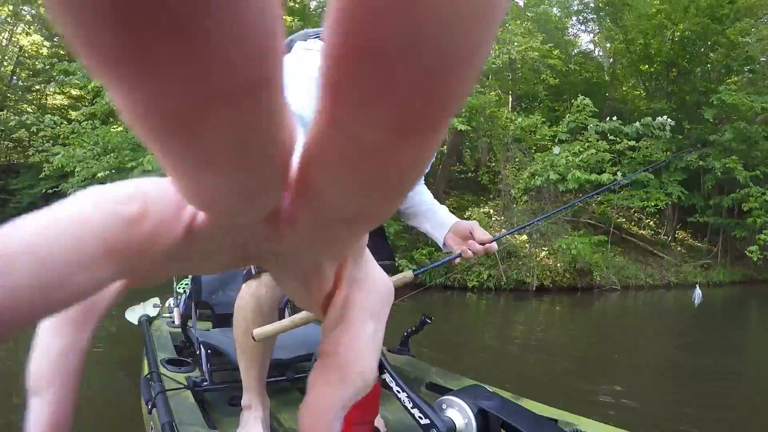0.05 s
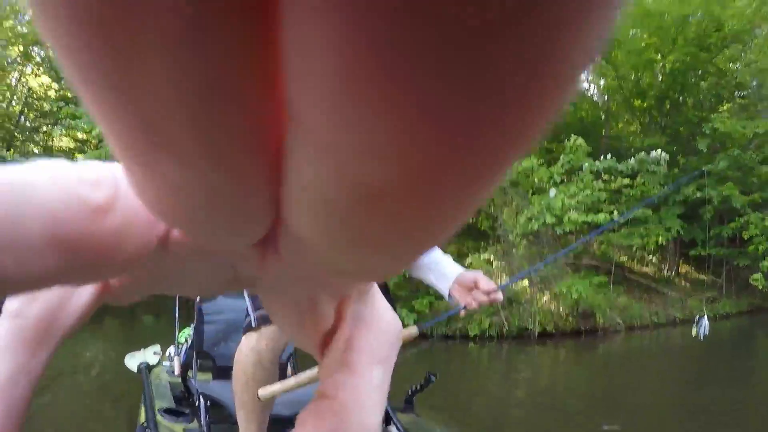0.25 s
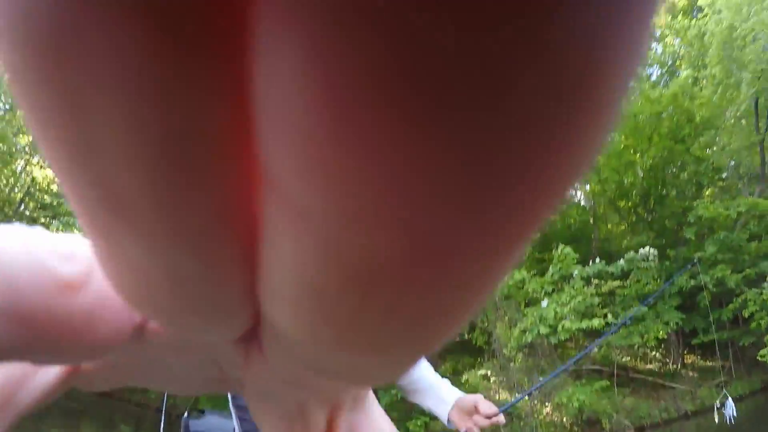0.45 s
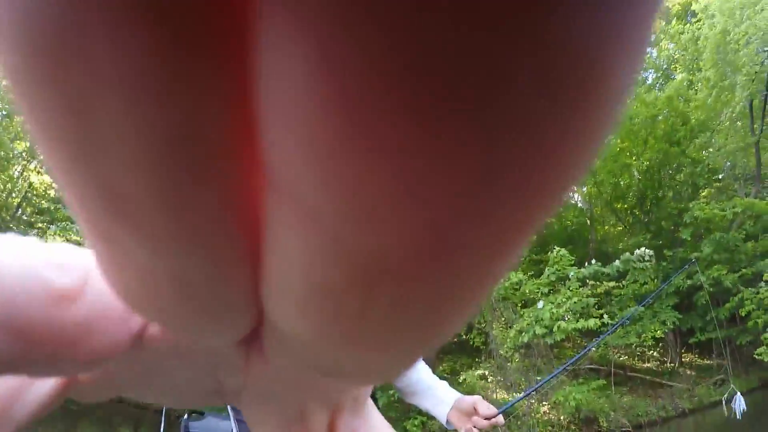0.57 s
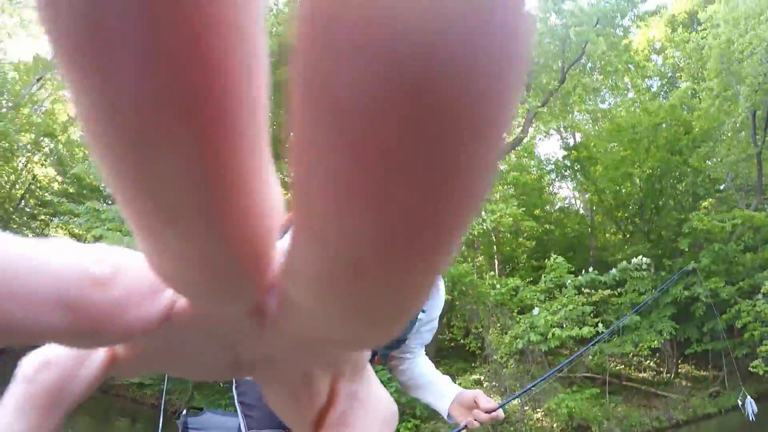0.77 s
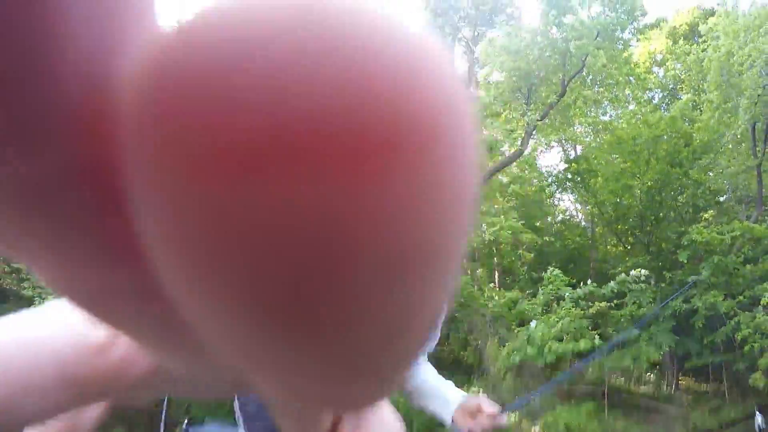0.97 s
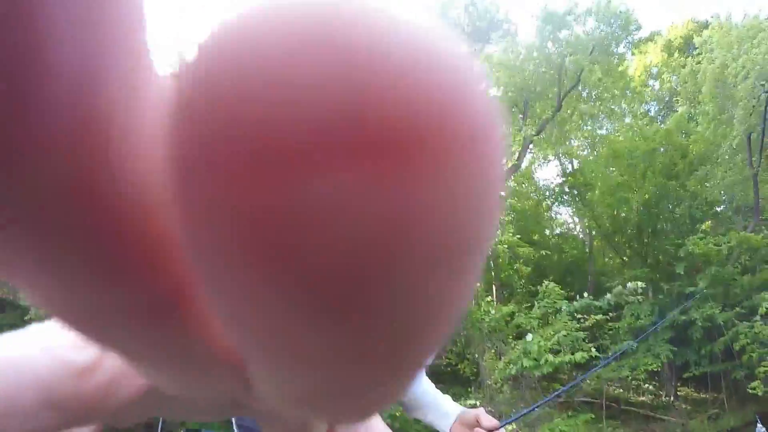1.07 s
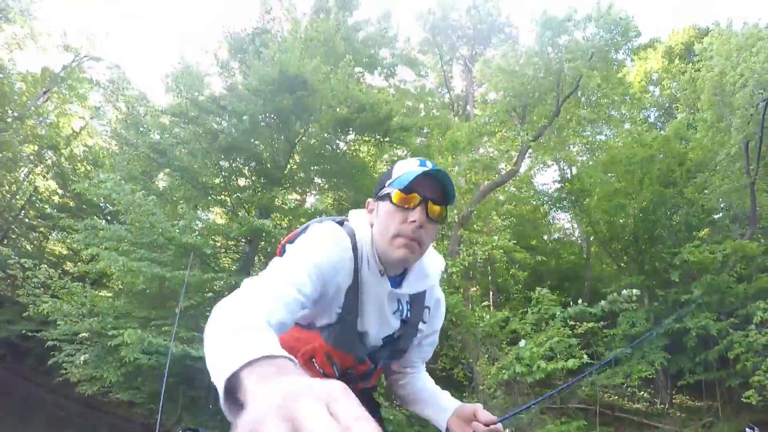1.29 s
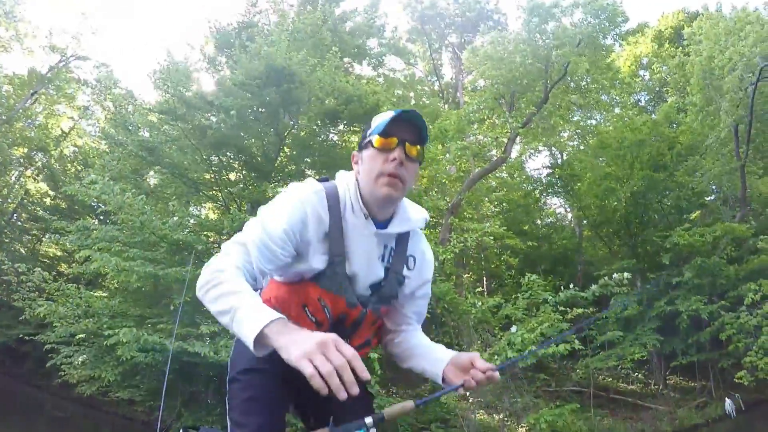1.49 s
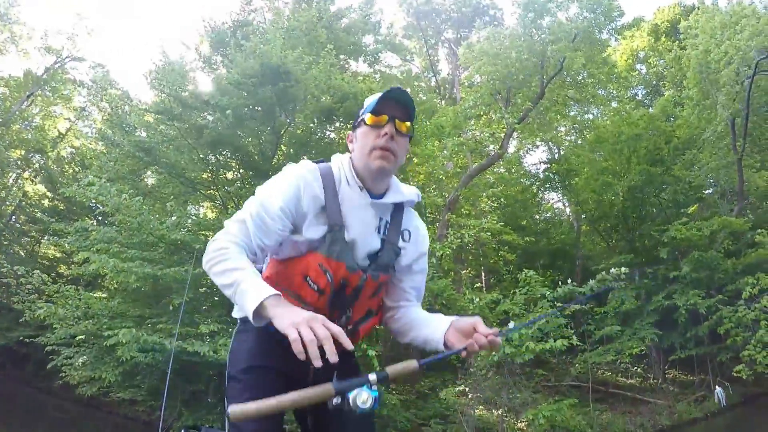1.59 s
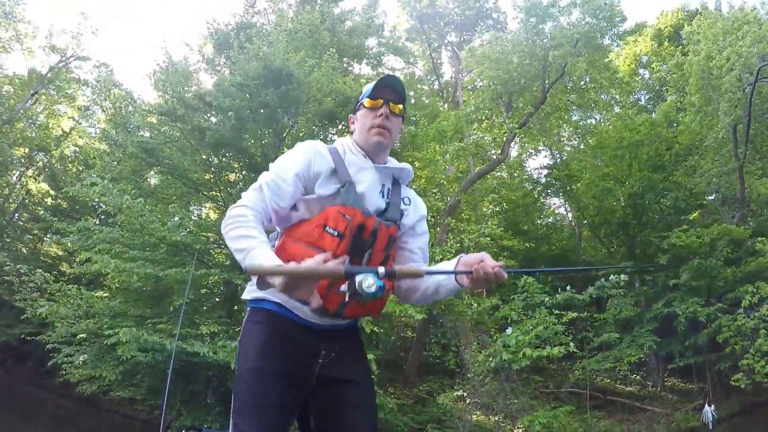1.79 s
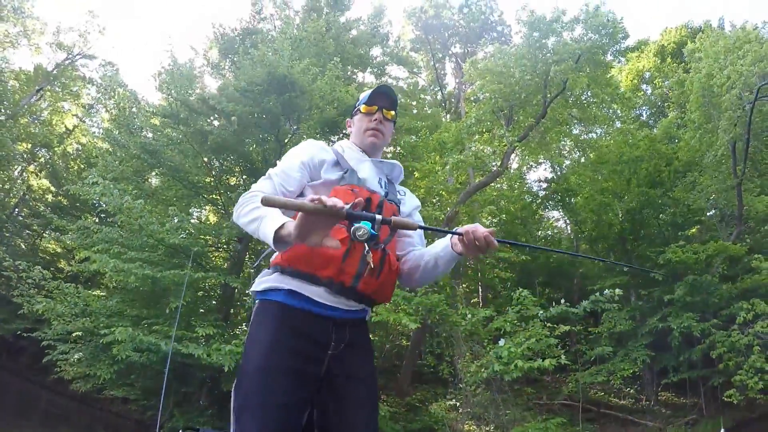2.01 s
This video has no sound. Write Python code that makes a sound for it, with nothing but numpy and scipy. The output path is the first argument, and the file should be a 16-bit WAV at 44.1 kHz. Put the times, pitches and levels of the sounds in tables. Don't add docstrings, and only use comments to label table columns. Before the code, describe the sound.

Hard plastic snaps and clicks as fingers tilt a small camera on a kayak mount

```python
import sys
import numpy as np
from scipy import signal
from scipy.io import wavfile
from scipy.ndimage import uniform_filter1d

SR = 44100
rng = np.random.default_rng(int(sys.argv[2]) if len(sys.argv) > 2 else 0)


def invert_db(level):
    return 10 ** (np.asarray(level, dtype=float) / 20)


def bounce(signal):
    frames = np.transpose(np.atleast_2d(signal))
    limited = np.clip(frames, -1, 1)
    pcm = np.round(limited * 32767).astype(np.int16)
    wavfile.write(sys.argv[1], SR, pcm)


N = 90404


def evened(x):
    return x / np.sqrt(np.mean(x ** 2) + 1e-20)


def add(mix, start_s, sound):
    part = mix[round(start_s * SR):][:len(sound)]
    part += sound[:len(part)]


def noise(points, peaks, size, patchy_db, flicker_db, source=None):
    x = rng.standard_normal(N) if source is None else source
    hz, frame_s, z = signal.stft(x, SR, nperseg=size, noverlap=size * 3 // 4)
    point_hz, point_db = np.transpose(points)
    db = np.interp(np.log(hz + 1), np.log(point_hz + 1), point_db, left=-70, right=-90)
    for center_hz, width_hz, peak_db in peaks:
        db = db + peak_db / (1 + (2 * (hz - center_hz) / width_hz) ** 2)
    patch = uniform_filter1d(rng.standard_normal(z.shape), size=4, axis=0)
    patch = evened(uniform_filter1d(patch, size=16, axis=1))
    flicker = evened(uniform_filter1d(rng.standard_normal(len(frame_s)), size=3))
    z = z * invert_db(db[:, None] + patchy_db * patch + flicker_db * flicker)
    return evened(signal.istft(z, SR, nperseg=size, noverlap=size * 3 // 4)[1][:N])


def ring(modes, drive, tilt_db=0):
    t, out = np.arange(SR // 2) / SR, 0
    for hz, db, t60_s in modes:
        mode = signal.fftconvolve(invert_db(-60 * t / t60_s) * np.sin(2 * np.pi * hz * t), drive)
        out = out + invert_db(db + tilt_db * np.log2(hz / 3000)) * mode / abs(mode).max()
    return out / abs(out).max()


def bump(length_s):
    return np.hanning(max(int(length_s * SR), 1) + 2)[1:-1]


# frequency in Hz, density in dB per Hz.
AIR = [(290, -39.5), (500, -10.5), (641, 0.5), (821, -12), (936, -7.5), (1610, -11), (5080, -13),
       (14700, -25), (16300, -47.5)]
# frequency in Hz, width in Hz, height in dB.
AIR_PEAKS = [(2600, 330, 7), (4720, 280, 6.5), (9500, 110, -1.5), (14300, 300, 10.5)]


def air():
    return invert_db(-64) * noise(AIR, AIR_PEAKS, size=512, patchy_db=-0.9, flicker_db=0.5)


# frequency in Hz, density in dB per Hz.
RIVER = [(8.8, -38), (15, -14.5), (49, 1), (82, -12.5), (183, -24.5), (221, -21), (351, -29), (402, -22.5),
         (900, -49), (1170, -88.5), (1980, -120)]
# frequency in Hz, width in Hz, height in dB.
RIVER_PEAKS = [(420, 150, 3), (258, 22, 1)]
# time in seconds, level in dB.
RIVER_SWAY = [(0.0, -37), (0.14, -51.5), (0.26, -41.5), (0.53, -43.5), (0.77, -43.5), (1.21, -41.5),
              (1.38, -43), (1.549, -44), (1.75, -44.5), (2.05, -42.5)]


def river():
    point_s, point_db = np.transpose(RIVER_SWAY)
    level_db = np.interp(np.arange(N) / SR, point_s, point_db) + 3
    return invert_db(level_db) * noise(RIVER, RIVER_PEAKS, size=2048, patchy_db=2.0, flicker_db=1.0)


# frequency in Hz, density in dB per Hz.
LEAVES = [(590, -28), (1000, -6), (1940, 12.5), (2250, -6), (2700, 12.5), (3370, 2), (4820, 5.5),
          (9000, -29), (11700, -55.5), (19800, -120)]


def leaves():
    peak_s, rise_s, fall_s, level_db = 1.52, 0.06, 0.25, -63
    t = np.arange(N) / SR
    gust = np.exp(-((t - peak_s) / np.where(t < peak_s, rise_s, fall_s)) ** 2)
    return invert_db(level_db) * gust * noise(LEAVES, [], size=512, patchy_db=1.2, flicker_db=0.9)


# start in seconds, length in seconds, start in Hz, end in Hz, level in dB.
BIRD_NOTES = [
    (.735, 0.055, 2547, 2517, -60),
    (0.809, 0.055, 2540, 2560, -68),
    (0.833, 0.057, 2300, 2210, -70.5),
    (.95, 0.057, 2523, 2430, -76),
    (1.041, 0.029, 2785, 2560, -59),
    (1.087, 0.0974, 2646, 2520, -59.5),
    (1.207, 0.042, 2270, 2210, -67.5),
    (1.906, 0.075, 2193, 2300, -66.5),
    (1.978, 0.11, 2275, 2310, -67),
]


def bird():
    woods_db, woods_t60_s = -8.5, 0.53
    out = np.zeros(N)
    for start_s, length_s, from_hz, to_hz, db in BIRD_NOTES:
        u = np.arange(0, length_s, 1 / SR) / length_s
        hz = from_hz + (to_hz - from_hz) * u ** 1.28
        swell = np.sin(np.pi * u) ** 0.31
        add(out, start_s, invert_db(db + 1.5) * swell * np.sin(2 * np.pi * np.cumsum(hz) / SR))
    tail = rng.standard_normal(SR) * invert_db(-60 * np.arange(SR) / SR / woods_t60_s)
    return out + invert_db(woods_db) * signal.fftconvolve(out, tail / np.linalg.norm(tail))[:N]


# frequency in Hz, level in dB, t60 in seconds.
HULL = [(160, -1, 0.12), (306, 1, 0.078), (614, 3, 0.082), (700, 7, 0.036), (916, -15, 0.038),
        (1137, 2.5, 0.028), (1570, -18, 0.017), (2220, -14, 0.023)]
# start in seconds, level in dB, rattle in seconds, hardness in dB per octave.
KNOCKS = [
    (.638, -34.5, 0.011, -3),
    (.7722, -29, 0.0073, -0.5),
    (1.8205, -34.5, 0.0073, -4.5),
    (1.9006, -37.5, 0.0029, 20),
    (1.9023, -25, 0.0073, 1),
]


def hull_knocks():
    out, t = np.zeros(N), np.arange(2500) / SR
    for start_s, db, rattle_s, tilt_db in KNOCKS:
        bounces = rng.random(2500) < 1500 / SR
        drive = rng.standard_normal(2500) * bounces * np.exp(-t / rattle_s) * 0.66
        drive[0] = -1
        add(out, start_s, invert_db(db) * ring(HULL, np.convolve(drive, bump(0.00042)), tilt_db))
    return out


# frequency in Hz, level in dB, t60 in seconds.
STALK = [(39, -6.5, 0.21), (66.23, 1, 0.049), (125, -14.5, 0.14)]
# start in seconds, level in dB, quickness in dB per octave.
JOLTS = [
    (0.232, -14, -10),
    (0.254, -16, 3),
    (1.052, -15, 2),
    (1.078, -21.5, 1),
    (1.175, -25, -11),
    (0.152, -29, 3),
    (.722, -33, 14),
]


def stalk_jolts():
    out = np.zeros(N)
    for start_s, db, tilt_db in JOLTS:
        add(out, start_s, -invert_db(db) * ring(STALK, bump(0.008), tilt_db))
    return out


# frequency in Hz, width in Hz, height in dB.
RUB_PEAKS = [(970, 280, 0), (2870, 900, 5), (3780, 430, 1), (4900, 500, 4), (7400, 600, 7), (11100, 700, 5),
             (14300, 600, 0), (1753, 740, -6.5), (6400, 560, -4), (9400, 900, -1.5)]


def rubs(strokes, colour):
    grit_per_s, grit_db, min_fall_s = 22000, 1.6, 0.006
    t, power = np.arange(N) / SR, np.zeros(N)
    for start_s, length_s, db, rise_share, gain_db in strokes:
        u = (t - start_s) / length_s
        rise = np.clip(u / max(rise_share, 0.01), 0, 1)
        fall = np.clip((1 - u) / max(rise_share, min_fall_s / length_s), 0, 1)
        level = invert_db(db + gain_db * np.clip(u, 0, 1))
        power += (np.sin(np.pi / 2 * rise * fall) * level) ** 2
    grit = rng.standard_normal(N) * (rng.random(N) < grit_per_s / SR)
    grit *= invert_db(grit_db * np.minimum(rng.exponential(1, N), 4))
    return np.sqrt(power) * noise(colour, RUB_PEAKS, size=256, patchy_db=1.0, flicker_db=0.5, source=grit)


# start in seconds, length in seconds, level in dB, rise as a share of the length,
# gain over the stroke in dB.
FIRM_STROKES = [
    (.1385, 0.09, -40.5, 0.033, 12.5),
    (.914, 0.023, -36.5, 0.48, -1),
    (.936, 0.036, -60, 0.08, -2.5),
]
# frequency in Hz, density in dB per Hz.
SKIN = [(180, -43), (300, -6.5), (478, -6.5), (774, -12.5), (1010, -9), (1690, -21.5), (3700, -16.5),
        (15000, -43.5), (16000, -47)]
LIGHT_STROKES = [
    (.27, 0.11, -44.5, 0.58, -11),
    (.365, 0.11, -42, 0.68, -2.5),
    (.45, 0.1, -50, 0.53, 6.5),
    (.686, 0.022, -47, 0.087, 4.5),
    (.708, 0.02, -46.5, 0.55, 20),
    (1.056, 0.041, -46, 0.073, -12),
]
# frequency in Hz, density in dB per Hz.
PAD = [(410, -35), (700, -2.5), (3110, -12), (4550, -20), (5120, -11), (8100, -30), (14600, -31.5),
       (16000, -43)]


def finger_rubs():
    return rubs(FIRM_STROKES, SKIN) + rubs(LIGHT_STROKES, PAD)


def crack(modes, tilt_db):
    swell_s, rattle_s, rattle_db = 0.00045, 0.003, -21.5
    t = np.arange(SR // 8) / SR
    hz, db, t60_s = np.transpose(modes)[:, :, None]
    level = invert_db(db + tilt_db * np.log2(hz / 3000) - 60 * t / t60_s)
    tones = level * np.sin(2 * np.pi * (hz * t + rng.random(hz.shape)))
    out = tones.sum(0) * (1 - np.exp(-(t / swell_s) ** 2))
    out /= abs(out).max()
    slip_t = t[:1499]
    slips = np.diff(rng.standard_normal(1500)) * np.exp(-slip_t / rattle_s) * np.minimum(slip_t / swell_s, 1)
    return out + invert_db(rattle_db) * ring(modes, slips, tilt_db - 3.5)[:len(t)]


def snap(crack_db, tilt_db, shell_db, cavity_db, bright, shell, hollow, push):
    out = np.zeros(SR)
    add(out, 0, invert_db(crack_db) * crack(bright, tilt_db))
    shell_force = np.diff(bump(0.00043), prepend=0, append=0)
    add(out, 0, -invert_db(shell_db) * ring(shell, shell_force))
    add(out, 0.001, push * invert_db(cavity_db) * ring(hollow, bump(0.0011)))
    return out


# start in seconds, crack in dB, hardness in dB per octave, shell in dB, cavity in dB.
LET_GO = [
    (1.1636, -23.5, 2.5, -21.5, -18.5),
]
# frequency in Hz, level in dB, t60 in seconds.
TICK = [(1780, -10, 0.0087), (2700, -2, 0.0039), (5670, -16, 0.0085), (7320, -11.5, 0.007),
        (10820, -14, 0.0049), (13700, -26, .004), (3380, 2.5, 0.0044), (3895, 0, 0.009), (4400, -7, 0.0097),
        (8960, -21, .005)]
LET_SHELL = [(750, -1, .006), (1050, 6, 0.016), (1230, -29, 0.0066), (1880, -22, 0.011)]
THUMP = [(407, 31, 0.021), (622, 35, 0.012), (1150, -26, 0.015), (267, -37, 0.044)]


def finger_release():
    out = np.zeros(N)
    for start_s, *levels in LET_GO:
        add(out, start_s, snap(*levels, TICK, LET_SHELL, THUMP, push=-2.23))
    return out


# start in
# seconds, crack in dB, hardness in dB per octave, shell in dB, cavity in dB.
SNAPS = [(.1385, -52, -2, -29.5, -27), (.2222, -25, -2, -41, -47), (.2437, -8.5, -6.5, -21, -15),
         (.2451, -12.5, -5.5, -15, -28), (.2500, -30.5, -5, -15.5, -29), (.5270, -32.5, 6, -69.5, -69.5),
         (.6896, -21.5, 5.5, -31.5, -68), (.6920, -24, -6, -18.5, -65), (.7219, -11, -0.5, -7.5, -54),
         (.9151, -40, 3, -32.5, -48), (1.0030, -60.5, -8, -52, -38), (1.0497, -45, 3, -36.5, -20)]
BANG = [
    (.2293, -1, 0, -27, -20.5),
    (.2302, 1, 0, -16, -16),
    (.2310, 0, 0.005, -5, 1.5),
]
SEAT = [
    (1.0521, -22, 0.00083, -4.5, -13.5),
]
# frequency in Hz, level in dB, t60 in seconds.
CRACK = [(1880, -0.5, 0.0044), (2490, -0.5, 0.0074), (5570, -6, 0.012), (7400, -21.5, 0.0039),
         (8450, -24, .005), (11300, -28, .004), (14300, -31, .004), (2080, -27, .05), (2210, -25, 0.055),
         (3100, -4.5, 0.0068), (3810, -3, 0.0067), (5100, -1.5, .007)]
SPLIT = [(2173, -32.5, 0.049), (2210, -31.5, .05), (2560, -2, 0.0039), (3624, -6.5, .005),
         (5060, -4.5, 0.0061), (5873, -13.5, 0.0068), (7230, -16.5, 0.0052), (8470, -14.5, 0.0046),
         (10000, -15.5, 0.0042), (11100, -22, 0.0043), (6700, -16, .006), (14200, -22.5, .005),
         (15000, -28, .005)]
SEAT_CRACK = [(2174, -12, 0.076), (3420, -16, 0.004), (4070, -2, 0.0056), (4700, -2, 0.011),
              (5330, -7, 0.016), (6030, -3.5, 0.0063), (6720, -6.5, 0.0078), (7770, -2, 0.005),
              (9950, -8.5, 0.0032), (13520, -19, 0.0057)]
SHELL = [(710, -3.5, 0.0068), (1060, 2, 0.017), (1240, -9.5, 0.0053), (1990, -7.5, 0.008),
         (2450, -9, 0.0068), (3000, -12, 0.0042)]
SEAT_SHELL = [(726, -1.5, 0.0043), (1030, 9, 0.0063), (1390, -33, 0.0039), (2160, 2, 0.0077),
              (2560, -2.5, 0.0092)]
CAVITY = [(279, -5.5, 0.1), (381, 2, .045), (485, 9.5, 0.051), (556, -1, 0.063), (626, -3, 0.045),
          (709.6, -11, .03)]


def mount_snaps():
    out = np.zeros(N)
    for events, bright, shell in [(SNAPS, CRACK, SHELL), (BANG, SPLIT, SHELL), (SEAT, SEAT_CRACK, SEAT_SHELL)]:
        for start_s, *levels in events:
            add(out, start_s, snap(*levels, bright, shell, CAVITY, push=0.78))
    return out


def scene():
    mix = air() + river() + leaves() + bird() + hull_knocks()
    mix += stalk_jolts() + finger_rubs() + finger_release() + mount_snaps()
    return mix[None]


def top_cut(x):
    return signal.sosfilt(signal.butter(12, 16460, fs=SR, output="sos"), x)


def record(dry):
    clip, edge_hz = 0.94, 16400
    lowpass = signal.firwin(255, edge_hz, window=("kaiser", 9), fs=SR)[None]
    mix = signal.oaconvolve(np.clip(dry, -clip, clip), lowpass, "same")
    return top_cut(mix)


dry = scene()
out = record(dry)
bounce(out)
```